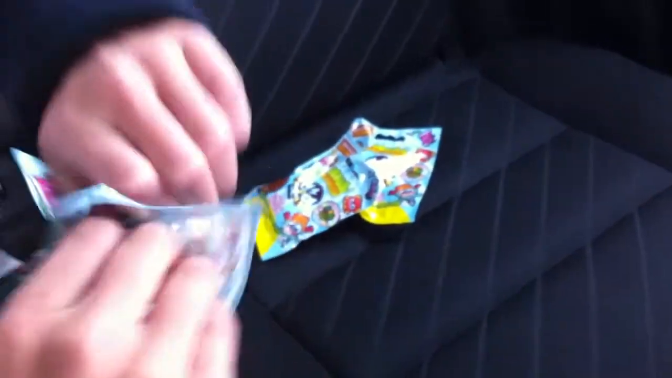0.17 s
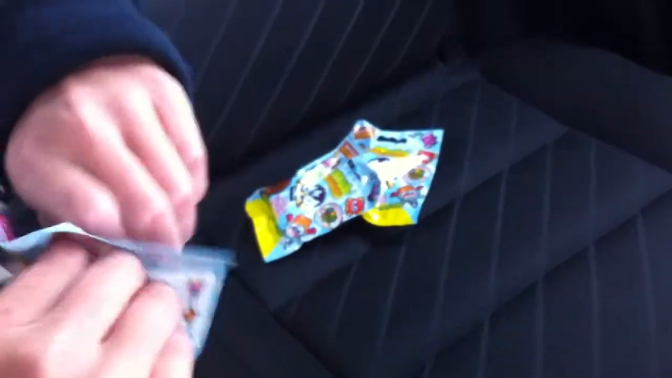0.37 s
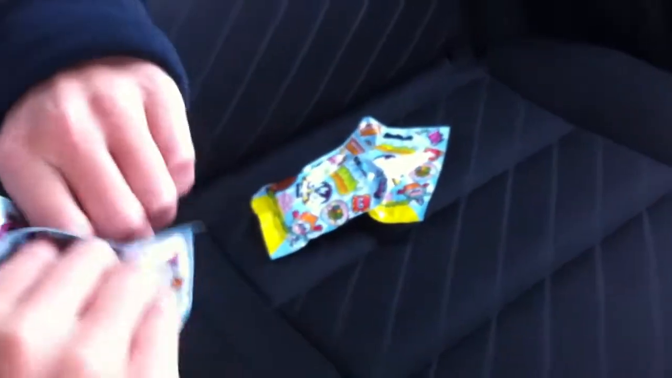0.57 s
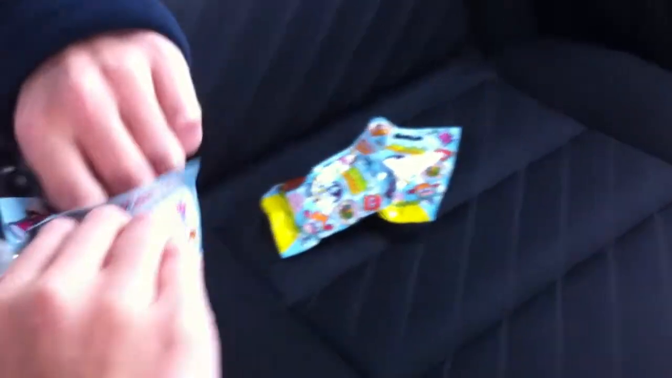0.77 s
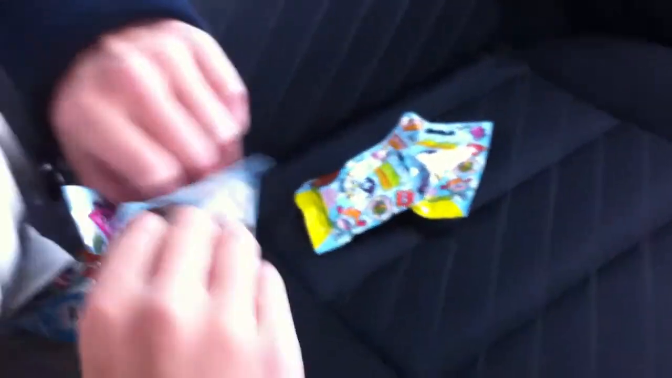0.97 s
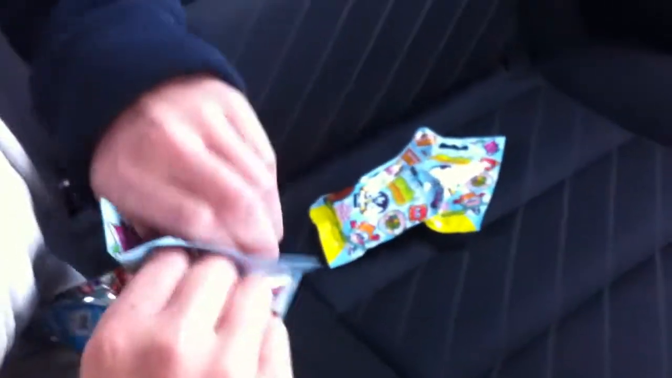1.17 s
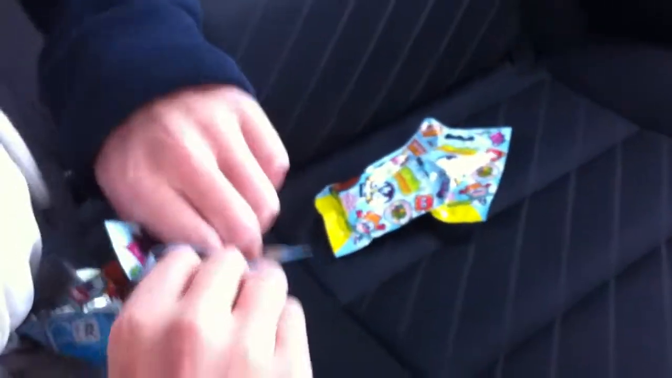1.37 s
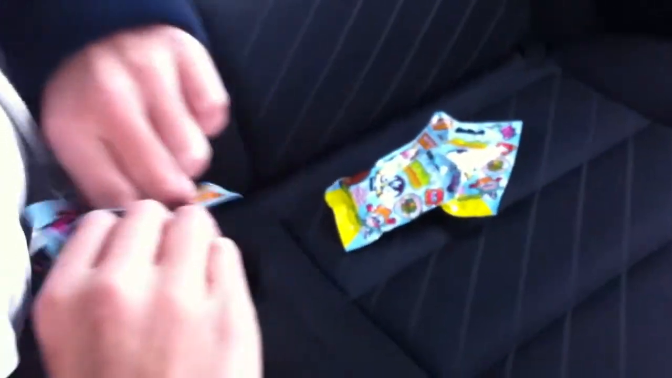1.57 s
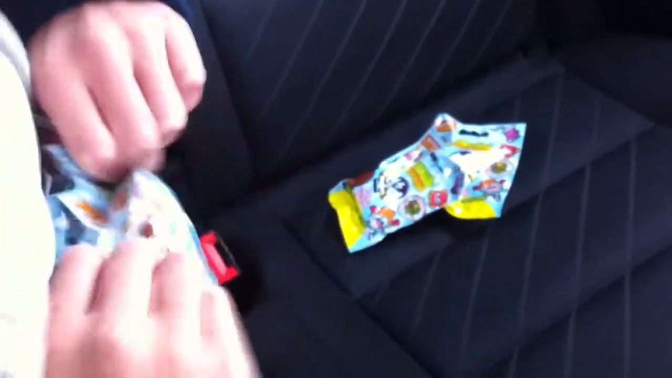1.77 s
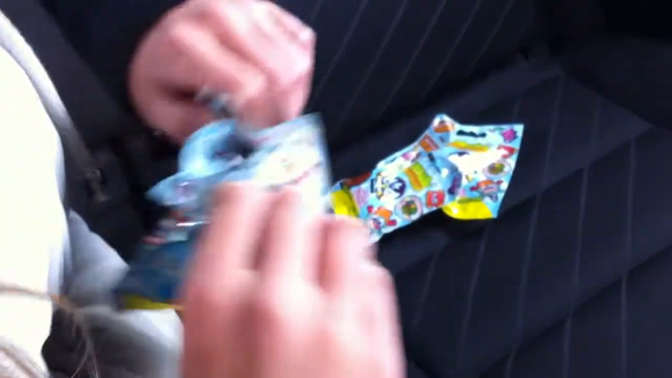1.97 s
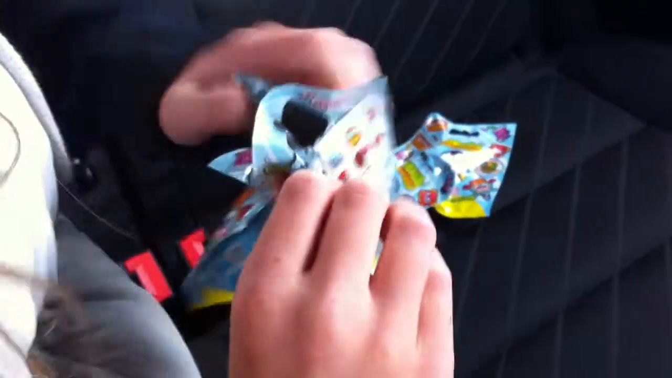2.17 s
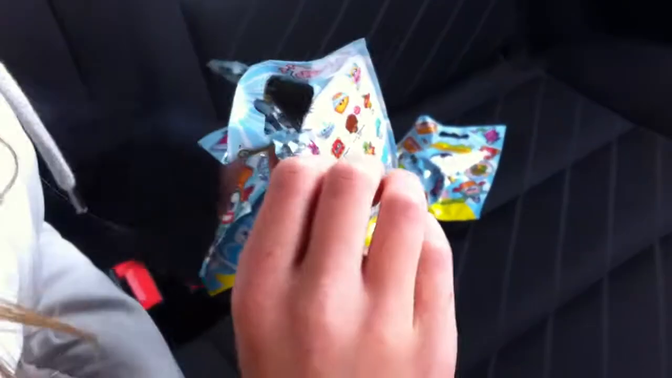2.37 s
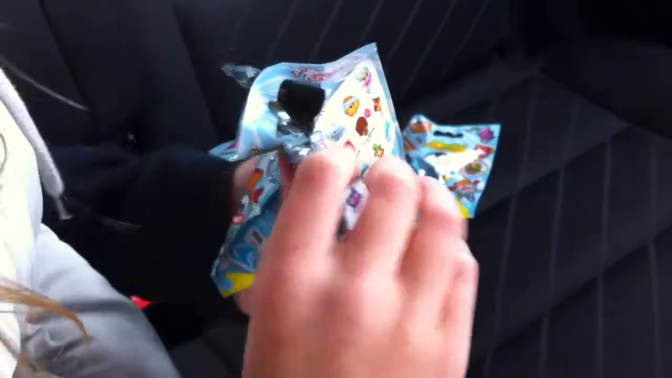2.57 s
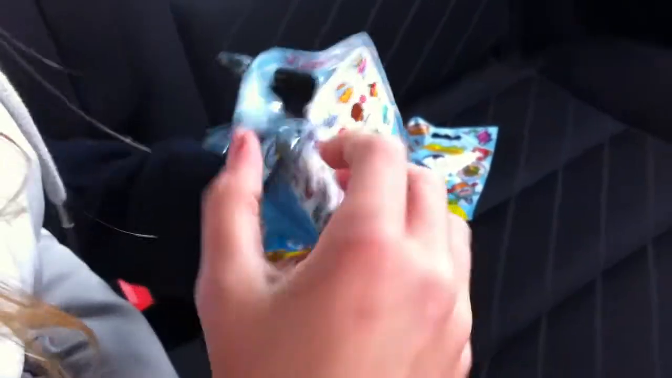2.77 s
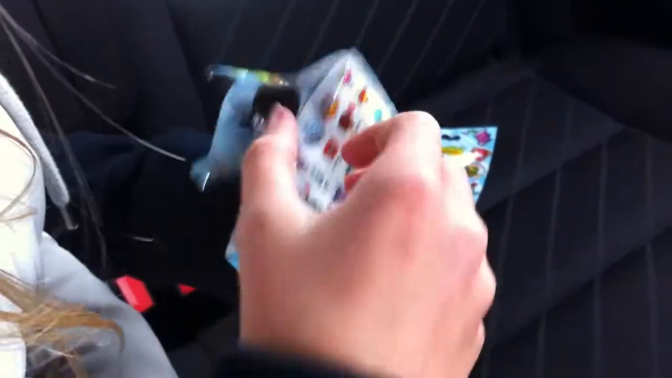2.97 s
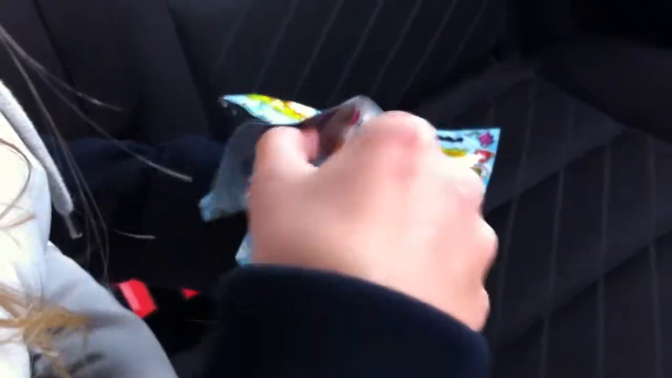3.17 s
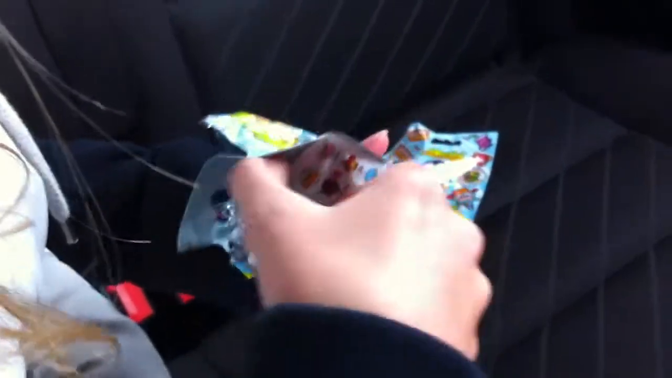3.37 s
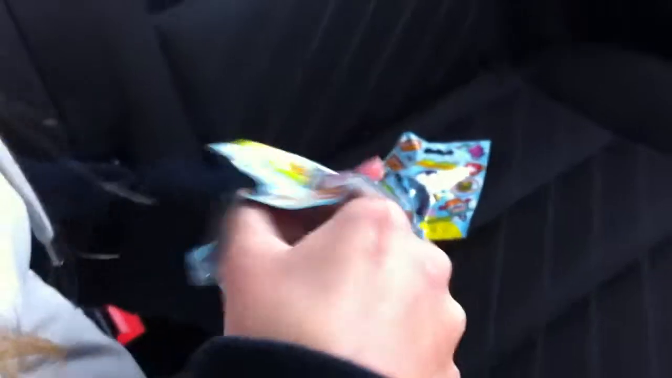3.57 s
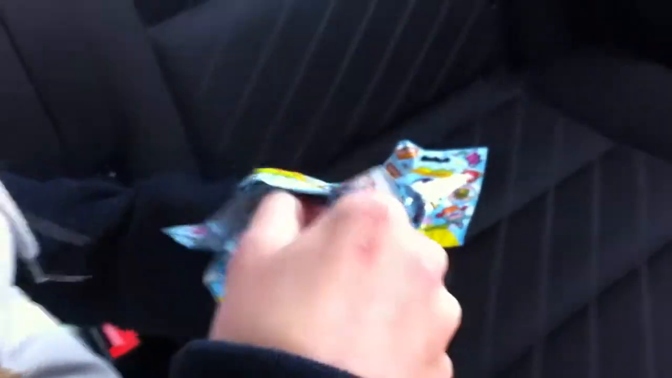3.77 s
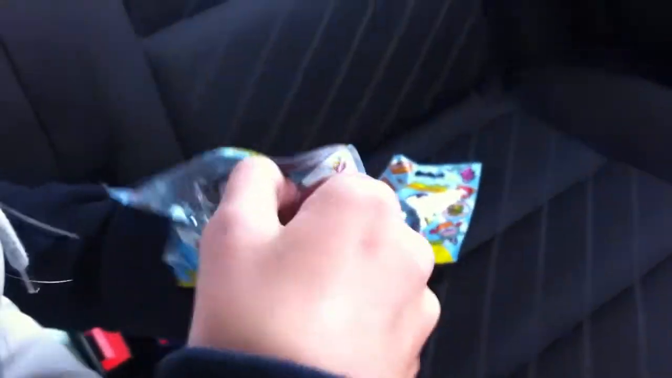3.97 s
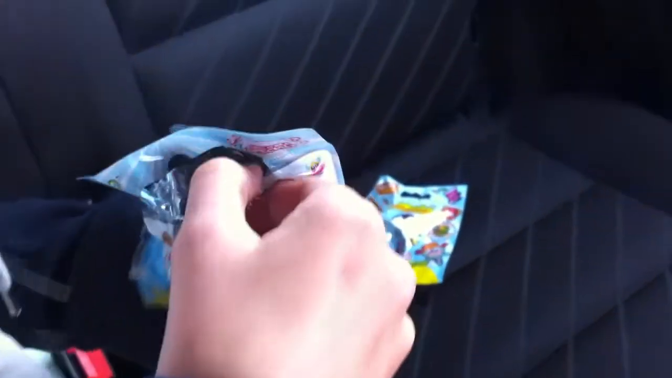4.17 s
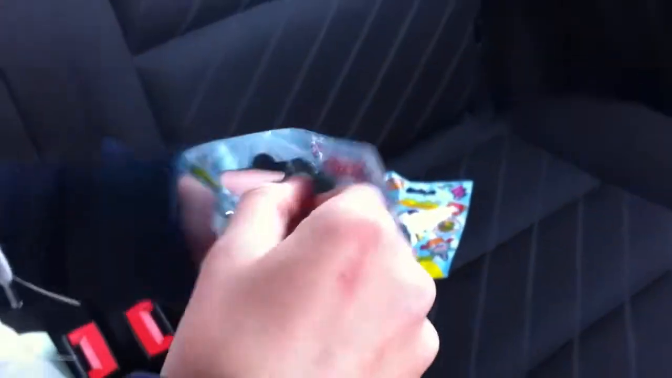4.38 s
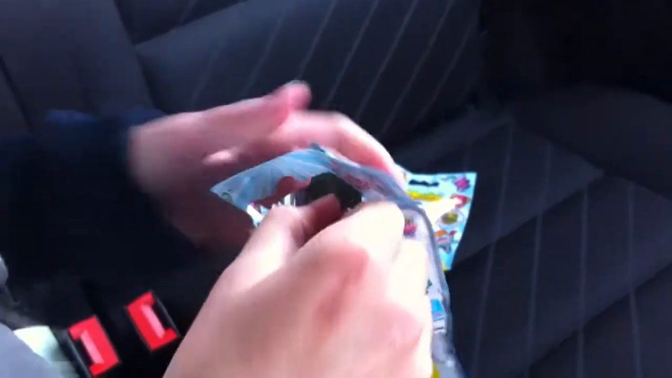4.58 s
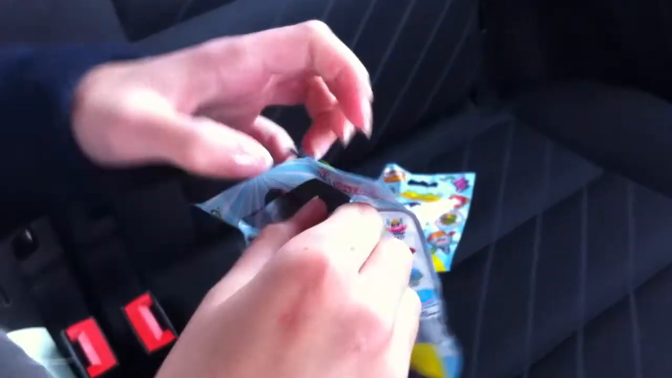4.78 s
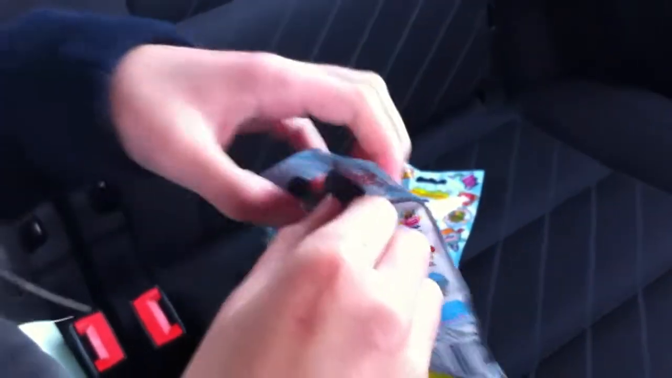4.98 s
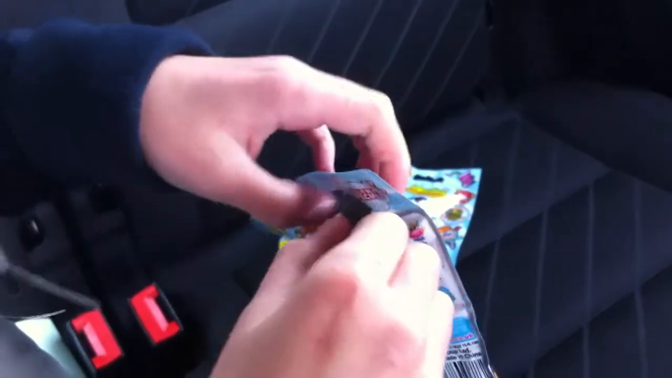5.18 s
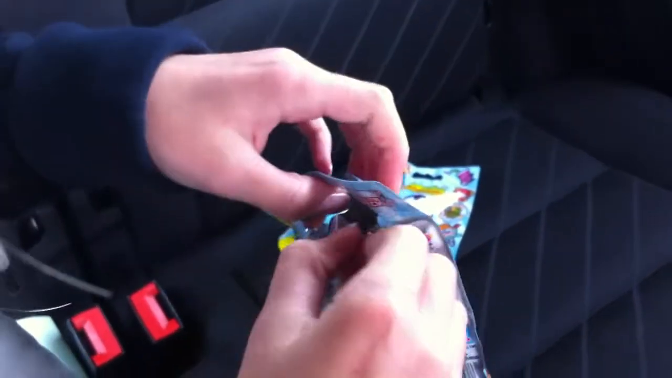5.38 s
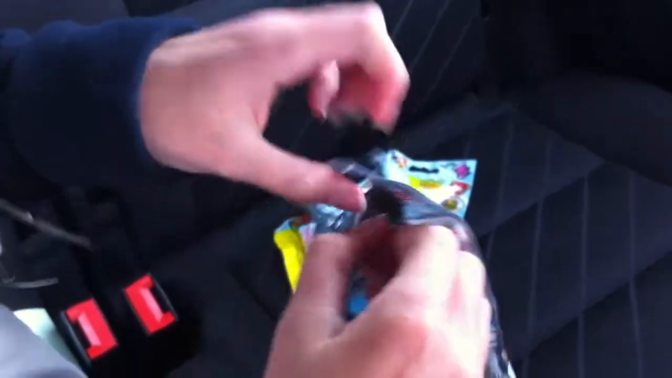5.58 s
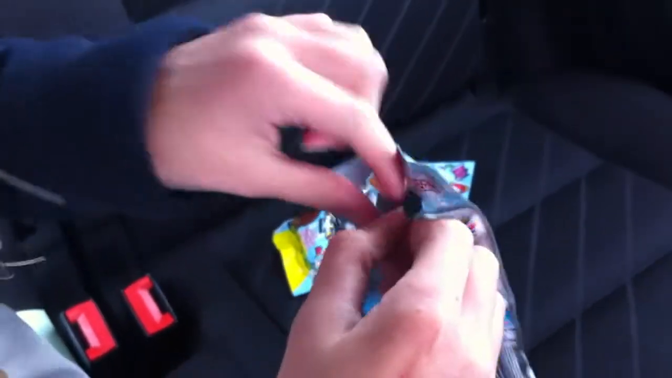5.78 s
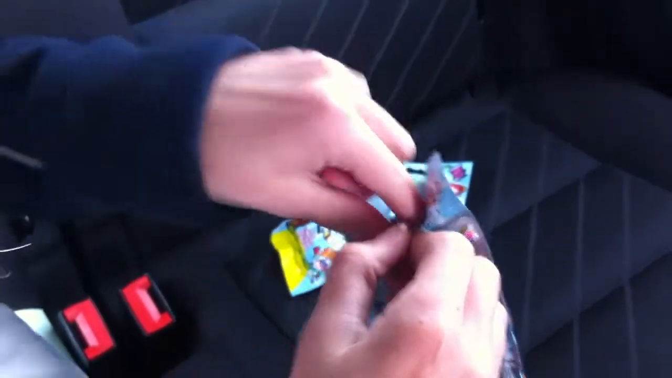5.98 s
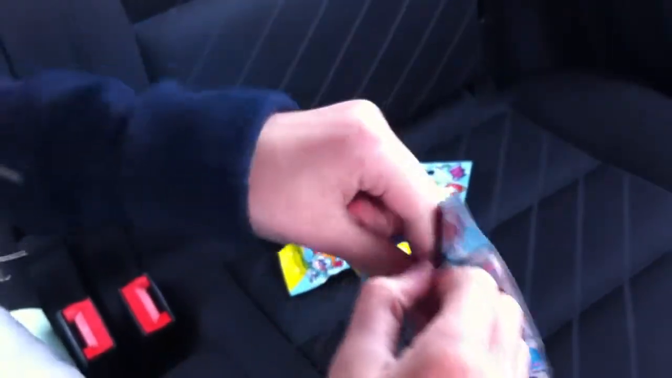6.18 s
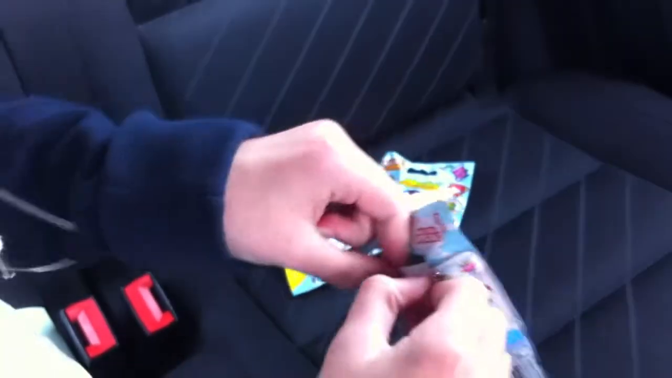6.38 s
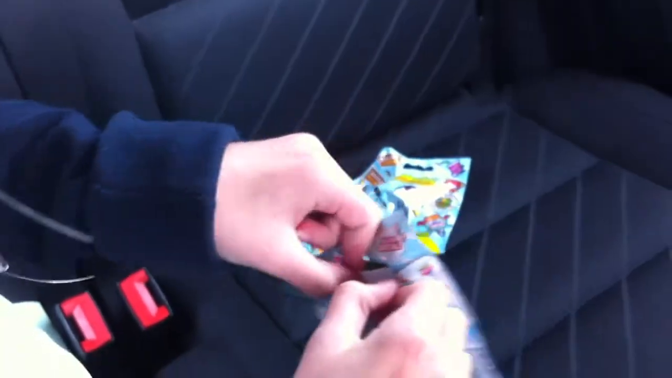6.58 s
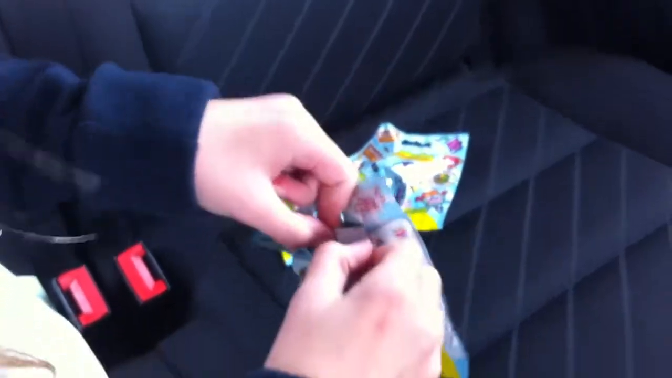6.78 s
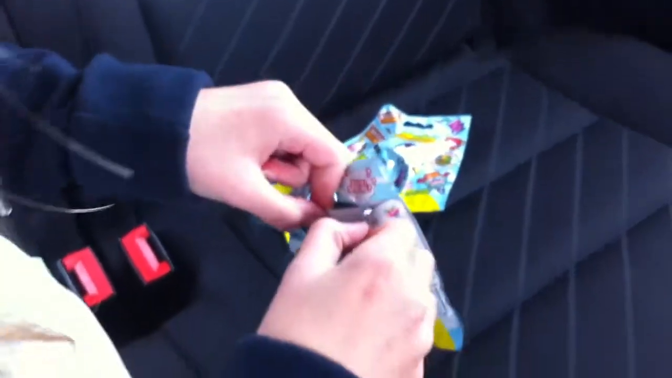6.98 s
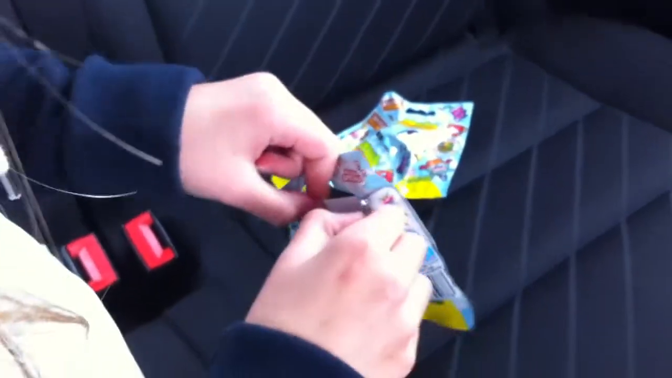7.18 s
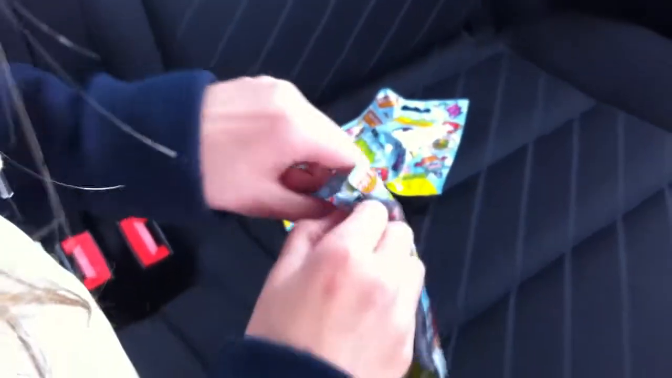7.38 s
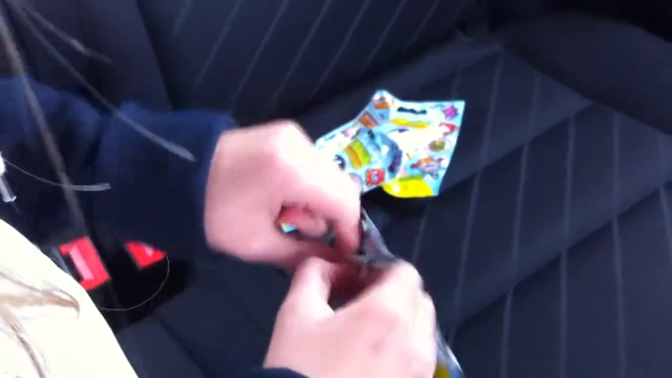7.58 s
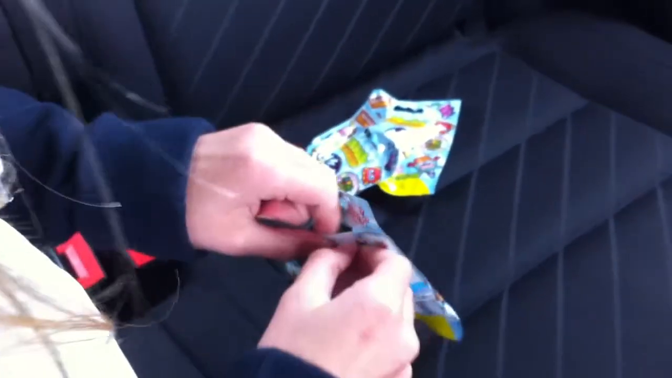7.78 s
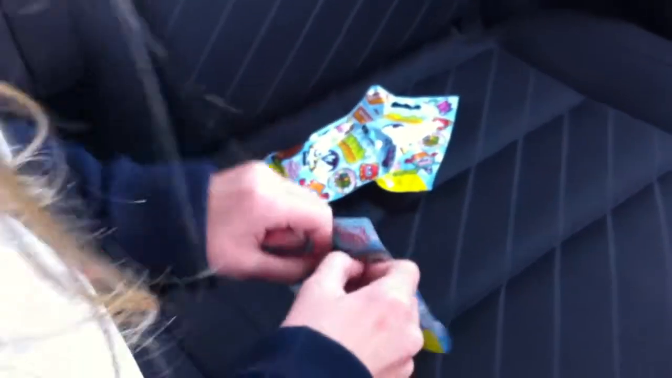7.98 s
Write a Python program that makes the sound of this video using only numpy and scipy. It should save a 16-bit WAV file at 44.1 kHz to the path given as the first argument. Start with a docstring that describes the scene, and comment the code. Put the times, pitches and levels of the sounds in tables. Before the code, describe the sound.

Loud bright tearing of foil starts at once, surging several times with hard snaps and brief creaks, then stops abruptly. Finger slides whisper on the foil. Quiet, sparse crinkling follows, with tiny dull bumps and isolated clicks, clustering around four seconds and again after seven. The sound is close and dry, with very short padded car-cabin reflections, a wavering low rumble and steady soft hiss.

```python
"""Foil packet in a parked car

Hands tear open and crumple a small foil packet inside a parked car, an arm's length from a phone.
Creases buckle singly or creak in stick-slip runs: ragged bursts of force plus a short facet ring.
Dense swarms of tiny snaps make tearing and rustling; soft noise bumps and a narrow-band hum add body.
Shaped noise makes the finger slides and sleeve brushes. Short echoes give the padded cabin's answer,
over a wavering faint rumble and a steady hiss."""
import sys
import numpy as np
from scipy import signal
from scipy.fft import rfft, irfft, next_fast_len
from scipy.io import wavfile
from scipy.ndimage import uniform_filter1d

SR = 44100
rng = np.random.default_rng(int(sys.argv[2]) if len(sys.argv) > 2 else 0)


def materialize(psi):
    """Save the field psi as 16-bit PCM at rate SR to the path in sys.argv[1].

    A 1-D psi becomes a single channel; in a 2-D psi each row is a channel.
    """
    bounded = np.clip(np.atleast_2d(psi).T, -1, 1)
    quanta = np.round(bounded * 32767).astype(np.int16)
    wavfile.write(sys.argv[1], SR, quanta)


N = 353549


def undb(db):
    """Decibel law: 20 dB is a factor of ten in amplitude."""
    return 10 ** (np.asarray(db) / 20)


def band(x, lo_hz, hi_hz, db):
    """Energy-compensated band-pass: hands on the whole energy of a flat input, times a trim."""
    hi_hz = min(hi_hz, .45 * SR)
    sos = signal.butter(2, [lo_hz, hi_hz], "band", fs=SR, output="sos")
    makeup = np.sqrt(SR / 2 / (hi_hz - lo_hz))
    return undb(db) * makeup * signal.sosfilt(sos, x)


def noise(spectrum, db):
    """Spectral shaping: steady noise through (frequency [Hz], density [dB]) points, at an RMS level."""
    hz, shape_db = np.transpose(spectrum)
    size = next_fast_len(N)
    bin_hz = np.arange(size // 2 + 1) * SR / size
    gain = undb(np.interp(np.log(bin_hz + 1), np.log(hz), shape_db))
    x = irfft(rfft(rng.standard_normal(size)) * gain, size)[:N]
    return undb(db) * x / x.std()


def walk(rate):
    """Slow random modulation: levels held 1 / rate s and slewed twice; spread near 1."""
    hold = int(SR / rate)
    steps = np.repeat(rng.standard_normal(N // hold + 1), hold)
    return np.sqrt(2) * uniform_filter1d(uniform_filter1d(steps, hold), hold)[:N]


def swell(rows):
    """Half-sine envelope: amplitude rises and falls once for each (start [s], end [s], level [dB])."""
    t = np.arange(N) / SR
    return sum(undb(db) * np.sin(np.pi * np.clip((t - a) / (b - a), 0, 1)) for a, b, db in rows)


def superpose(s, bursts):
    """Linear superposition: adds each row of samples at its own start time."""
    size = bursts.shape[1]
    where = (s * SR).astype(int)[:, None] + np.arange(size)
    return np.bincount(where.ravel(), bursts.ravel(), N + size)[:N]


# what a snap sets going: (low edge [Hz], high edge [Hz], trim [dB])
RING, CRACK = (1200, 18600, -3.5), (3360, 9450, -3.5)
BODY, KNOCK, SIZZLE = (403, 1906, -0.54), (1370, 2275, -10), (11620, 14640, -0.6)
RING_CYCLES = 1.24  # decay constant of the ring, in cycles of its pitch


def snaps(s, crack_db, hz, body_db, knock_db, sizzle_db, burst_s, size=48):
    """Impulsive buckling: each crease is a short ragged burst of force, and its facet rings briefly."""
    def unit_energy(rows):
        return rows / np.linalg.norm(rows, axis=1, keepdims=True)

    ragged = rng.standard_normal((len(s), size))
    burst = unit_energy(ragged * np.exp(-np.arange(size) / (burst_s * SR)))
    cycles = np.clip(hz, 2000, 14000)[:, None] * np.arange(size) / SR
    ring_envelope = np.sqrt(cycles) * np.exp(-cycles / RING_CYCLES)
    ring = unit_energy(np.sign(ragged[:, 1:2]) * np.sin(2 * np.pi * cycles) * ring_envelope)
    # the pouch is too slow to follow the raggedness and feels one push, in or out
    push = np.sign(ragged[:, :1]) * (np.arange(size) == 0)
    shares = [(RING, 0, ring), (CRACK, 0, burst), (BODY, body_db, push),
              (KNOCK, knock_db, burst + push), (SIZZLE, sizzle_db, burst)]
    sound = 0
    for part, share_db, shape in shares:
        force = superpose(s, undb(crack_db + share_db)[:, None] * shape)
        sound = sound + band(force, *part)
    return sound


# single creases that snap, levels before the trims of snaps() and the shares set in creases():
# (time [s], crack energy [dB], pitch [Hz], knock [dB re crack], sizzle [dB re crack])
SINGLE_SNAPS = [(0.041, -11.5, 4200, -11, -15), (0.1557, -26, 10900, -15, 6.5),
                (0.189, -17, 4430, -6, -7.5), (0.225, -24, 11000, -19, 2), (0.245, -6, 6610, -29, -16),
                (0.2707, -15, 5280, -4, -6.5), (0.2996, -12.5, 3800, -18, 2), (0.318, -14.5, 4030, -3, -5),
                (0.345, -18, 3800, -19, -12), (0.3559, -16, 4500, -11, 3), (0.3848, -18.5, 7600, -4.5, -3),
                (0.4248, -20.5, 5200, -5, -13.5), (0.4471, -14, 2750, -14.5, -18),
                (0.537, -20.5, 2480, 3.5, -9.5), (0.5696, -10.5, 8000, -9.5, -6),
                (0.5978, -10.5, 5100, -14, -4.5), (0.9754, -28, 5830, -20, 5),
                (1.0135, -21.5, 11060, -14, 0), (1.056, -22.5, 4200, -0.5, -1),
                (1.0765, -17, 5500, -15, -9.5), (1.09, -14, 8300, -10, -1.5),
                (1.1117, -20.5, 6050, -2, -15), (1.1183, -15.5, 7800, -18, -2), (1.1533, -22, 10200, 1, -3),
                (1.1784, -11.5, 2260, -8, -12), (1.2474, -15.5, 5070, -4.5, -13),
                (1.2606, -22, 4280, -1, -28), (1.2715, -16, 5500, -6.5, -26.5),
                (1.3114, -22.5, 9760, -18, -3), (1.3334, -6, 4700, -19, -10.5),
                (1.392, -25, 2250, -5, -10.5), (1.432, -0.5, 2850, -10.5, -19),
                (1.7296, -7.5, 6100, -6, -9), (1.837, -8, 5060, -5, 5), (1.8846, -35, 3770, -4, -15),
                (1.9686, -12.5, 4400, -5, -22), (1.992, -6.5, 5560, -8.5, -17),
                (1.9987, -9.5, 2550, -5.5, -13), (2.0118, -11.5, 3690, -19.5, -8),
                (2.059, -20.5, 4200, -6, -22), (2.122, -20, 3070, -2, -21), (2.1917, -24.5, 3900, 0.5, -4),
                (2.2995, -26.5, 2220, -6, -17), (2.3155, -22, 7380, -3.5, -9), (2.336, -36, 3400, 1, -15),
                (2.3772, -25, 6050, -16, -3), (2.4396, -29, 10950, -4.5, -3), (2.4855, -35, 10700, -9, -4),
                (2.5487, -8.5, 6100, -9.5, -4.5), (2.5604, -17, 4500, -0.5, -7),
                (2.6175, -23.5, 2430, 6.5, -22), (2.6519, -26, 3320, -4, -2), (2.703, -35.5, 3630, 0.5, -6),
                (2.7685, -27.5, 3570, -1, -6.5), (2.784, -30, 2840, 4.5, -5.5), (2.8206, -34, 11100, 4, -4),
                (2.833, -19.5, 7450, 1, 2.5), (2.9496, -41.5, 2300, 7.5, -18), (3.1892, -30.5, 2330, 6, -5),
                (3.2543, -23.5, 5600, -2, -18), (3.2731, -26, 2280, 3.5, -29.5),
                (3.336, -32, 3040, 3.5, -16), (3.5856, -30, 4740, 3, -8), (3.678, -30, 2200, 9, -14.5),
                (3.6909, -30.5, 9400, -16, -2.5), (3.7579, -14.5, 9050, -7.5, -1),
                (3.8124, -26, 5810, -1.5, -17.5), (3.8234, -16, 5600, -3, -8), (3.876, -14, 2200, -5.5, -6),
                (3.8917, -15.5, 4850, -13, -7), (3.943, -22, 9700, -20, -9), (3.954, -19.5, 9800, -9, -8),
                (3.9704, -19.5, 8500, -20, -7), (3.9855, -18, 8670, -12, -4.5), (4.005, -18, 2500, -10, -5),
                (4.0138, -13.5, 8680, -7, -6), (4.0312, -19.5, 11000, -3.5, 1.5),
                (4.0375, -18, 2260, 3, -9.5), (4.2912, -35.5, 2270, 5, -6), (4.3788, -15, 4930, -3.5, -29),
                (4.394, -26, 3710, -8, -19.5), (4.416, -18, 2280, -4.5, -20), (4.4591, -22, 4620, -5.5, -7),
                (4.685, -35.5, 5140, 0, -17.5), (4.754, -30.5, 2300, 3.5, -8),
                (4.9189, -34.5, 6660, -1, -5), (5.1045, -26, 8820, -10, -7.5),
                (5.208, -15.5, 5630, -8, -2.5), (5.5587, -29, 8260, -16, -10),
                (5.8846, -27.5, 8600, -10.5, -10), (5.912, -34, 9850, -15, -6),
                (6.0292, -16, 8850, -8, -12), (6.0352, -18.5, 10800, -17, -4), (6.0443, -25.5, 8000, 0, -6),
                (6.0747, -18, 5100, -6, -10), (6.2249, -29, 2330, -2.5, -20),
                (6.2936, -27.5, 2870, -8, -13), (6.3656, -31.5, 9100, 2, -6),
                (6.4467, -24.5, 10400, -8, -5), (6.4713, -37, 2300, 9.5, -14),
                (6.752, -19.5, 3200, -11, -19.5), (6.8406, -30, 2540, -4, -8), (6.9918, -28, 9700, -16, -1),
                (7.2791, -7, 5300, -20.5, -7), (7.3855, -8.5, 5470, -25, -15.5),
                (7.42, -25, 4500, -13, -21.5), (7.4302, -23.5, 5900, -3, -18), (7.4455, -15, 5800, -23, -8),
                (7.459, -23.5, 2320, 0.5, -16), (7.482, -31.5, 2240, 6, -6), (7.527, -26.5, 2290, 0.5, -19),
                (7.5553, -16, 2290, -8, -11), (7.5843, -34, 2330, -3, -15), (7.627, -17.5, 4680, -15, -1.5),
                (7.68, -19.5, 5430, -10, -18), (7.7226, -11.5, 8500, -17, -1),
                (7.745, -12.5, 8140, -14.5, -5), (7.7727, -18, 8100, -2.5, -15),
                (7.8354, -29.5, 5400, 3, -5), (7.8835, -18.5, 8750, -6.5, -7.5),
                (7.9278, -30.5, 2279, 8, -21.5), (7.9482, -17.5, 2560, -0.5, -13)]
SNAP_BODY_DB, LEAD_S = -2, .0004  # body re knock; the snap starts just before its peak
# neighbours: longest wait, highest level re the snap, range of levels below that
AFTER_S, AFTER_DB, AFTER_SPREAD_DB = .016, -11.5, 12


def creases(count=3):
    """Triggered buckling: each snap that stands out tips over a few weaker neighbours just after."""
    s, db, hz, knock_db, sizzle_db = np.repeat(SINGLE_SNAPS, count + 1, axis=0).T
    follows = np.arange(len(s)) % (count + 1) > 0
    wait, size, pitch = rng.random((len(s), 3)).T
    s = np.minimum(s + follows * AFTER_S * wait, (N - 1) / SR)
    db = db + follows * (AFTER_DB - AFTER_SPREAD_DB * size)
    hz = hz * np.exp(follows * (pitch - .5))
    body_db = knock_db + SNAP_BODY_DB
    return snaps(s - LEAD_S, db, hz, body_db, knock_db + 2.0, sizzle_db + 2.0, burst_s=0.0013)


# pulls and squeezes that set off a swarm of tiny snaps, levels before the offsets in rustle():
# (crest [s], crack level [dB], rise [s], fall [s], knock [dB re crack], sizzle [dB re crack])
SQUEEZE_EVENTS = [(0.075, -29.5, 0.63, 0.058, -3, -2.5), (.309, -39.5, 0.26, 0.17, -4.5, -9),
                  (.64, -36.5, 0.2, 0.23, -3, -4.5), (0.699, -33, 0.017, 0.12, 4, 5),
                  (0.76, -22, 0.093, 0.12, -9, -7.5), (0.916, -30, 0.25, 0.048, -8.5, -4.5),
                  (1.209, -48, 0.18, 0.11, 1.5, -12.5), (1.402, -47.5, 0.1, 0.071, 9.5, -19),
                  (1.445, -25.5, 0.058, 0.49, -3, -3.5), (1.834, -22.5, 0.13, 0.038, -4, -5.5),
                  (1.995, -33.5, 0.084, 0.037, -1, -11), (2.235, -52.5, 0.34, 0.069, -6.5, -12),
                  (2.558, -69, 0.17, 1, 1, -9), (2.788, -56.5, 0.03, 0.044, 6, -16),
                  (3.114, -57, 0.02, 0.038, 1.5, -11), (3.183, -59, 0.061, 0.0353, 10, -14),
                  (3.278, -63.5, 0.076, 0.12, 10, -12.5), (3.7, -60.5, 0.24, 0.023, 8.5, -13),
                  (3.751, -47, 0.061, 0.062, 4.5, -20), (3.831, -53.5, 0.042, 0.11, 3, -8),
                  (3.91, -50.5, 0.014, 0.1, 7, 9), (4.034, -46, 0.071, 0.021, 3.5, -19),
                  (4.47, -51.5, 0.143, 0.083, 6.5, -18), (4.759, -64.5, 0.46, 0.066, 5, -10),
                  (4.924, -60.5, 0.26, 0.08, 0.5, -10), (5.11, -57, 0.059, 0.11, -0.5, -8),
                  (5.383, -64.5, 0.22, 0.4, 3.5, -5), (5.858, -59.5, 0.035, 0.056, 4.5, -7),
                  (5.979, -56.5, 0.073, 0.074, 2.5, -4), (6.228, -56, 0.064, 0.082, 6.5, -21),
                  (6.342, -56, 0.21, 0.12, 0, -6), (6.63, -66, 0.23, 0.75, 2, -10),
                  (6.752, -59, 0.021, 0.022, 7, -22), (7.42, -48.5, 0.036, 0.077, -1.5, -9.5),
                  (7.618, -55, 0.15, 0.1, 4.5, -14), (7.942, -60, 0.18, 0.1, 6, -11)]
SWELL_DB = 20  # gained over one rise, lost over one fall
# moments when the fingers let go and every earlier squeeze dies at once [s]; the last lies past the end
LET_GO_S = [1.7, 2.028, 2.246, 4.485, 6.054, 9.]
LET_GO_DB_PER_S = 1498.5


def grip(s):
    """Exponential growth and decay: squeezes rise, fall or are let go; overlaps add in power and blend."""
    crest, db, rise, fall, *colour_db = np.transpose(SQUEEZE_EVENTS)[:, :, None]
    late = s - crest
    next_let_go = np.array(LET_GO_S)[np.searchsorted(LET_GO_S, crest)]
    db = db - LET_GO_DB_PER_S * np.maximum(s - next_let_go, 0)
    drop_db = SWELL_DB * np.where(late < 0, -late / rise, late / fall)
    power = undb(2 * (db - drop_db)) + 1e-30
    total = power.sum(0)
    knock_db, sizzle_db = ((power * colour).sum(0) / total for colour in colour_db)
    return 10 * np.log10(total), knock_db, sizzle_db


SWARM_PER_S, SWARM_HZ = 3000, 6730  # snap rate, centre of the facet pitches
SWARM_SPREAD_DB = 4  # scale of the loud tail, before the fits factor


def rustle(size_of_flurry=400):
    """Crackling noise: tiny snaps at random moments, a few much larger, bunch in flurries."""
    count = int(SWARM_PER_S * N / SR)
    when, size, luck = rng.random((count, 3)).T
    tint_db = 5.3 * rng.standard_normal((count, 3)).T
    s = when * (N - 1) / SR
    # facets of many sizes ring; their mean size wanders as the grip shifts
    wander = 0.14 * walk(25)[(s * SR).astype(int)]
    hz = SWARM_HZ * np.exp(0.42 * rng.standard_normal(count) + wander)
    db, knock_db, sizzle_db = grip(s)
    # one crease sets off its neighbours: flurries, in samples, switch on and off abruptly
    flurry_levels = np.clip(rng.standard_normal(N // size_of_flurry + 1), -2, 2)
    flurry = flurry_levels[(when * N // size_of_flurry).astype(int)]
    # loud tearing is even and thin; light handling comes in fits and moves the whole pouch
    fits = np.clip((-22.0 - db) / 26, .5, 1)
    db = db - 13.8 * fits * (luck < .7 * fits)  # most creases barely give under a light touch
    loud_tail_db = -SWARM_SPREAD_DB * np.log(1 - .97 * size)
    db = db + fits * (loud_tail_db - 5.15 * fits * flurry)
    tint_db = tint_db * np.sqrt(fits)
    body_db = knock_db - 17.0 + 10.34 * fits + tint_db[0]
    knock_db = knock_db - 6.9 * fits + tint_db[1]
    sizzle_db = sizzle_db + tint_db[2]
    return undb(6.5) * snaps(s, db, hz, body_db, knock_db, sizzle_db, burst_s=0.00032)


# foil that sticks and slips in a quick run of ticks, levels before the trims of snaps():
# (first tick [s], last tick [s], rate [ticks/s], crack energy [dB], pitch [Hz])
CREAK_RUNS = [(0.69, 0.72, 68, -12, 6650), (1.19, 1.236, 225, -25.5, 5050), (1.437, 1.464, 165, -17, 3990),
              (3.906, 3.93, 240, -22.5, 8900), (5.959, 6.013, 140, -29.5, 12820)]


def creaks():
    """Stick-slip friction: nearly even ticks, all close to one pitch within a run."""
    rows = []
    for first, last, rate, db, hz in CREAK_RUNS:
        ticks = round((last - first) * rate) + 1
        rows += [(s, db, hz, rate) for s in np.linspace(first, last, ticks)]
    s, db, hz, rate = np.transpose(rows)
    chance = rng.standard_normal((len(s), 3)).T
    s = s + 0.093 * chance[0] / rate
    db = db + 1.11 * chance[1]
    hz = hz * (1 + .05 * chance[2])
    return snaps(s, db, hz, -22.0, -8.5, -8.0, burst_s=0.00031)


# the contents or a finger bump the pouch: (time [s], envelope peak before the band-pass [dB])
BUMPS = [(.305, -45), (1.828, -33), (3.623, -48), (4.731, -51.5), (4.844, -53), (4.905, -44), (5.356, -50),
         (5.462, -54), (5.849, -50), (7.605, -50), (7.66, -50.5)]
THUD, THUD_S = (190, 980, -4.5), 0.005  # (low edge [Hz], high edge [Hz], trim [dB]); envelope time


def thuds(size=2048):
    """Damped impact: a dull, soft bump of low noise that rises and dies at once."""
    s, db = np.transpose(BUMPS)
    t = np.arange(size) / SR
    envelope = (t / THUD_S) * np.exp(1 - t / THUD_S)
    blow = rng.standard_normal((len(s), size)) * envelope * undb(db)[:, None]
    return band(superpose(s, blow), *THUD)


# the taut pouch hums while the seal peels: (start [s], end [s], level before the band trim [dB])
HUM = [(1.47, 1.6, -47.5)]
HUM_HZ = (727, 916)


def hum():
    """Narrow-band resonance: noise filtered twice to one band, its level fluttering."""
    once = band(rng.standard_normal(N), *HUM_HZ, 0)
    tone = band(once, *HUM_HZ, -20.5)
    return swell(HUM) * undb(2.5 * walk(52)) * tone


# a finger slides over the foil: (start [s], end [s], level before the gritty flutter [dB])
FINGER_SLIDES = [(.44, .56, -55.5), (1.87, 2.03, -49), (2.04, 2.11, -57.5), (2.12, 2.26, -54)]


def slide():
    """Sliding friction: skin on foil gives a short, bright, slightly gritty hiss."""
    hiss = noise([(300, -15.5), (1500, -1.5), (6000, -5.0), (10000, -5.5), (15000, -2.5)], 0)
    return swell(FINGER_SLIDES) * undb(1.6 * walk(140)) * hiss


# a sleeve brushes the seat: (start [s], end [s], level [dB])
SLEEVE_BRUSHES = [(3.287, 3.634, -59), (3.978, 4.426, -64.5)]


def sleeve():
    """Soft friction: cloth on cloth gives a smooth dull swell of noise."""
    return swell(SLEEVE_BRUSHES) * noise([(40, -39.0), (400, 4.5), (2000, 1.5), (8000, -11)], 0)


ECHO_T60_S, ECHO_DB, ECHO_DULL_HZ = 0.023, -5.5, 11440


def cabin(x, count=6):
    """Reverberation: dense fast-dying reflections off seats and glass, changing as the hands move."""
    t = np.arange(int(.08 * SR)) / SR
    decay = undb(-60 * t / ECHO_T60_S)
    onset = np.clip((t - .0014) / 0.00052, 0, 1)  # the first reflection arrives after the direct sound
    echo = rng.standard_normal((count, len(t))) * decay * onset
    dull = signal.butter(1, min(ECHO_DULL_HZ, .45 * SR), fs=SR, output="sos")
    echo = signal.sosfilt(dull, echo)
    echo /= np.sqrt(np.sum(echo ** 2, axis=1, keepdims=True))
    # a randomly chosen echo answers each stretch of 1024 samples
    place = np.repeat(rng.integers(0, count, N // 1024 + 1), 1024)[:N]
    reflected = sum(signal.fftconvolve(x * (place == k), echo[k])[:N] for k in range(count))
    return x + undb(ECHO_DB) * reflected


# spectrum of the background air noise, relative: (frequency [Hz], density [dB per Hz])
AIR_SPECTRUM = [(25, -10), (60, -15.5), (160, 1), (290, 2.5), (400, -0.5), (1000, -8), (3000, -11),
                (10500, -17.5), (15500, -16.5)]
AIR_DB = -69.5  # RMS level before the rumble is reset
# course of the rumble, before its wavering: (time [s], RMS level [dB])
RUMBLE_LEVEL = [(0.0, -65.5), (0.64, -65), (1.07, -70), (1.36, -65), (2.46, -70.5), (3.17, -70),
                (3.48, -60.5), (3.79, -62), (4.221, -65.5), (6.498, -69.5), (8.02, -68.5)]


def hush():
    """Low-pass transmission: outside rumble swells and wavers through the bodywork; mic hiss is smooth."""
    air = noise(AIR_SPECTRUM, AIR_DB)
    rumble = signal.sosfilt(signal.butter(2, 600, fs=SR, output="sos"), air)
    s, db = np.transpose(RUMBLE_LEVEL)
    rumble_db = 10 * np.log10(np.mean(rumble ** 2))
    gain_db = np.interp(np.arange(N) / SR, s, db) - rumble_db + 2.16 * walk(16)
    return air + rumble * (undb(gain_db) - 1)  # the low part of the air noise takes the new level


BASS_CUT_HZ = 125  # the handling sounds and their echoes are cut below this


def scene():
    """Superposition: all handling sounds share the cabin's echoes and bass cut, over the background."""
    handling = creases() + creaks() + rustle() + thuds() + hum() + slide() + sleeve()
    bass_cut = signal.butter(3, BASS_CUT_HZ, "high", fs=SR, output="sos")
    near = signal.sosfilt(bass_cut, cabin(handling))
    return (near + hush())[None]


TOP_HZ = 15700


def record(dry):
    """Saturation and low-pass: the loudest peaks are rounded, and nothing sounds above about 15.7 kHz."""
    rounded = np.tanh(1.886 * dry) / 1.222
    return signal.sosfilt(signal.ellip(12, .3, 80, TOP_HZ, fs=SR, output="sos"), rounded)


dry = scene()
out = record(dry)
materialize(out)
```